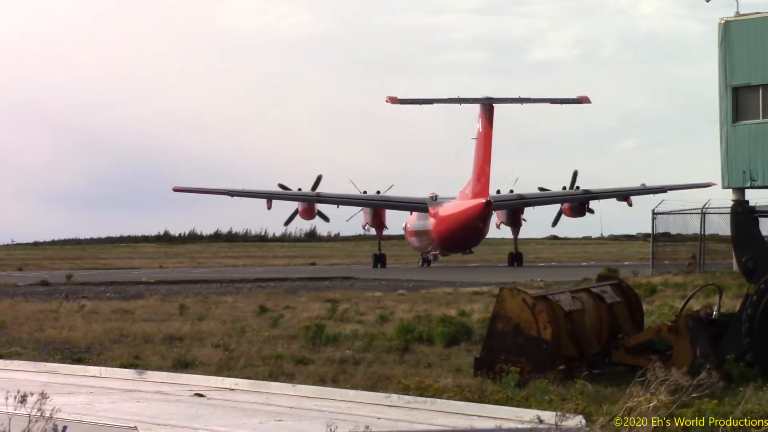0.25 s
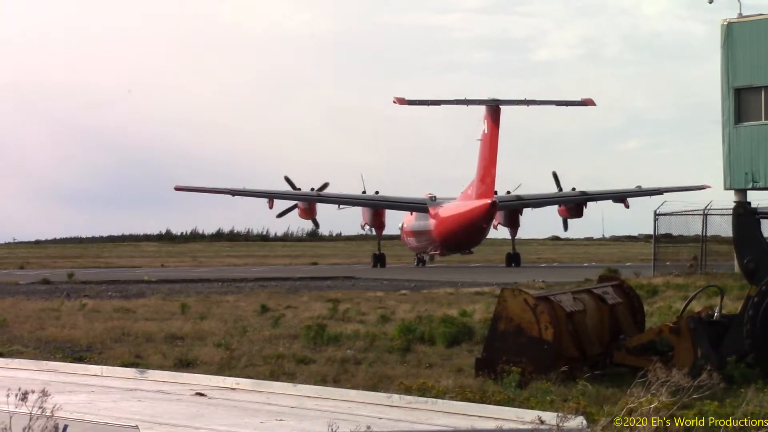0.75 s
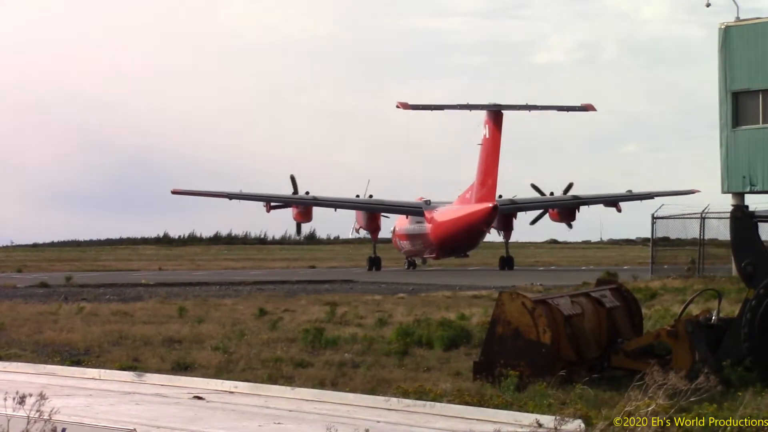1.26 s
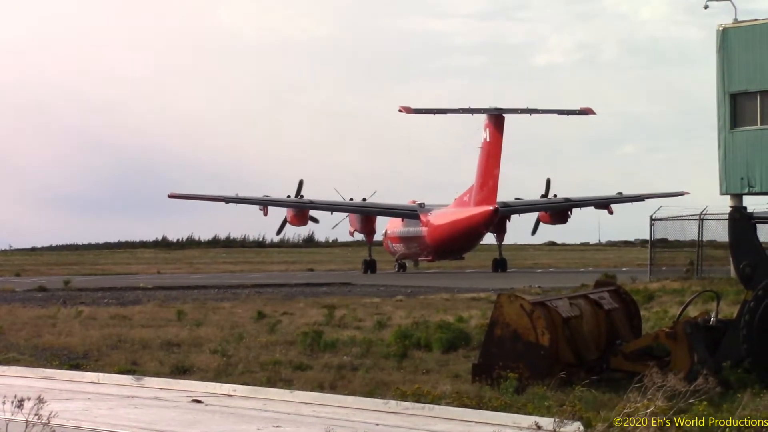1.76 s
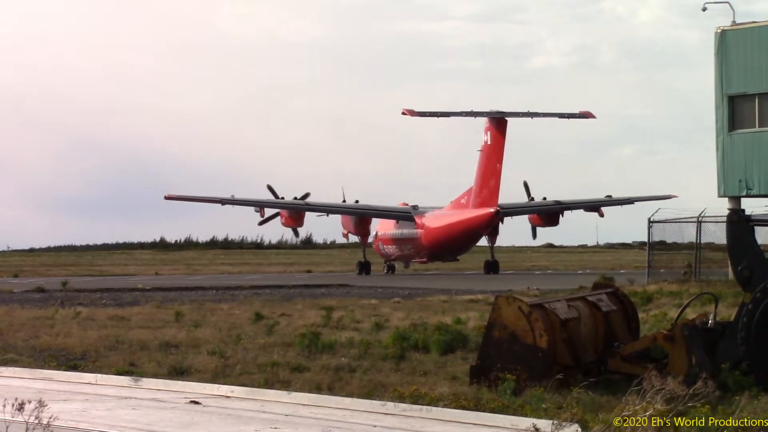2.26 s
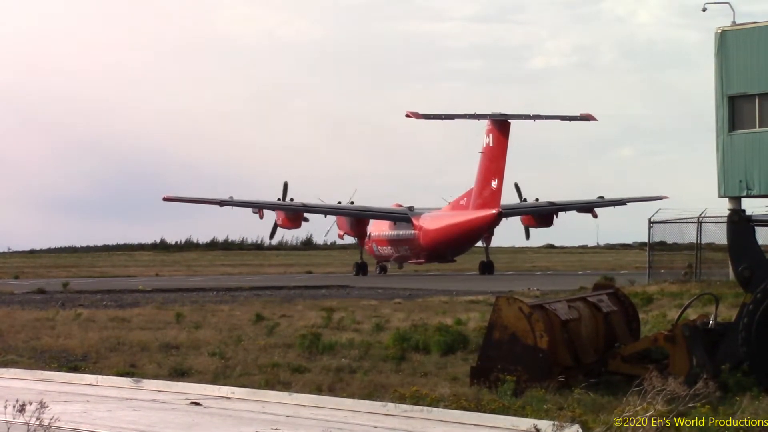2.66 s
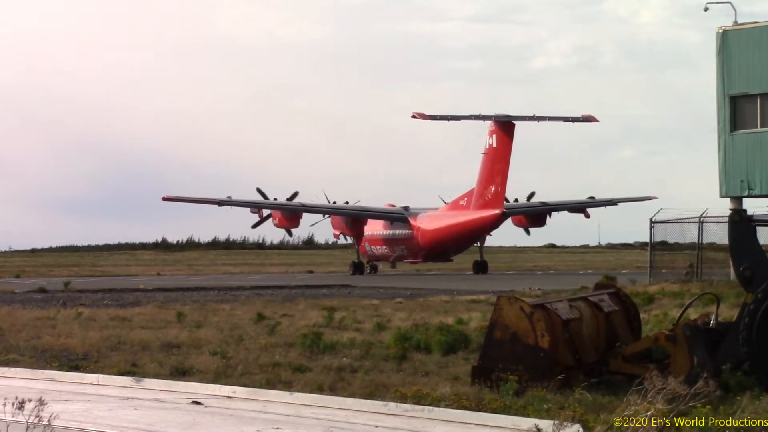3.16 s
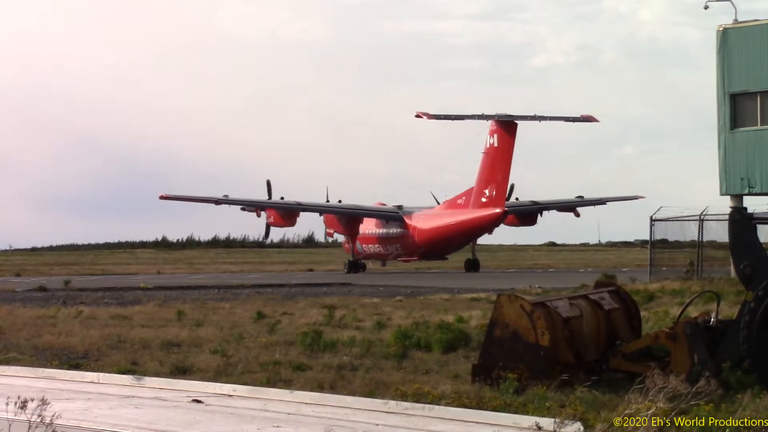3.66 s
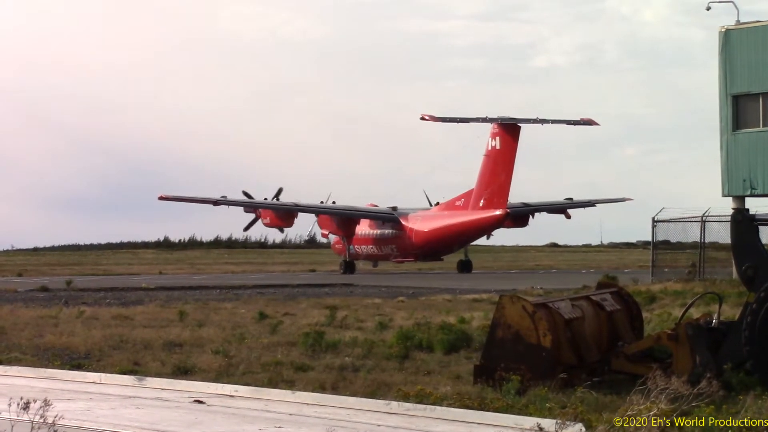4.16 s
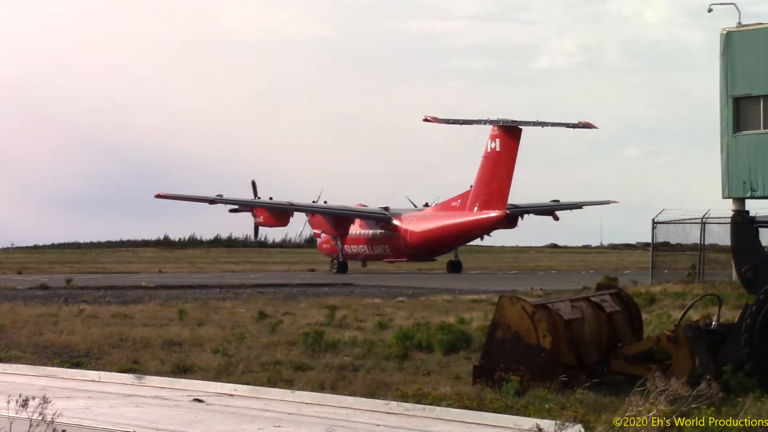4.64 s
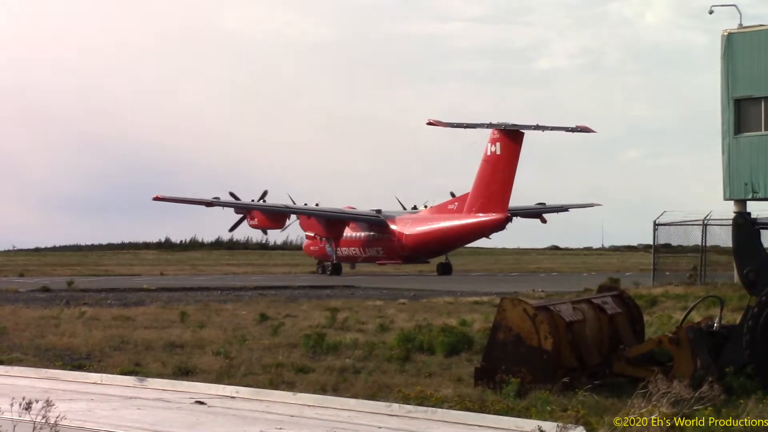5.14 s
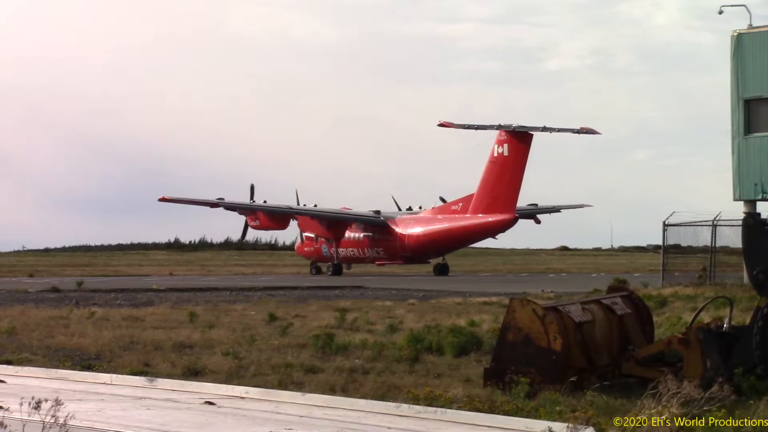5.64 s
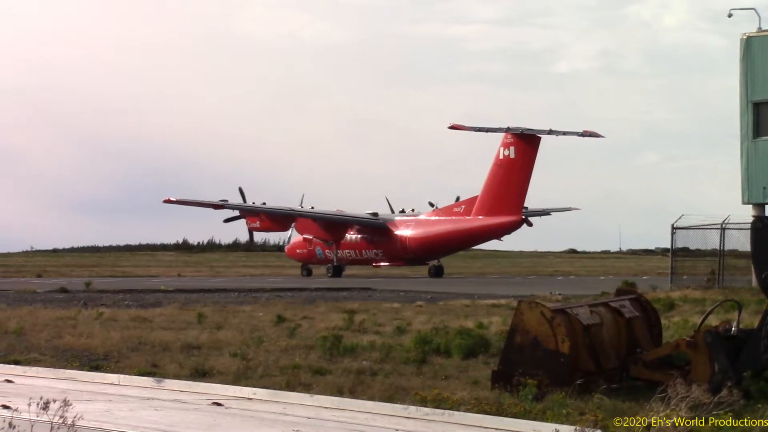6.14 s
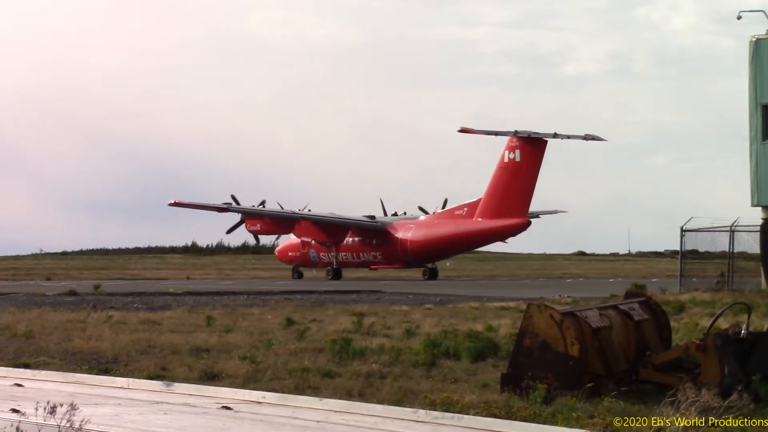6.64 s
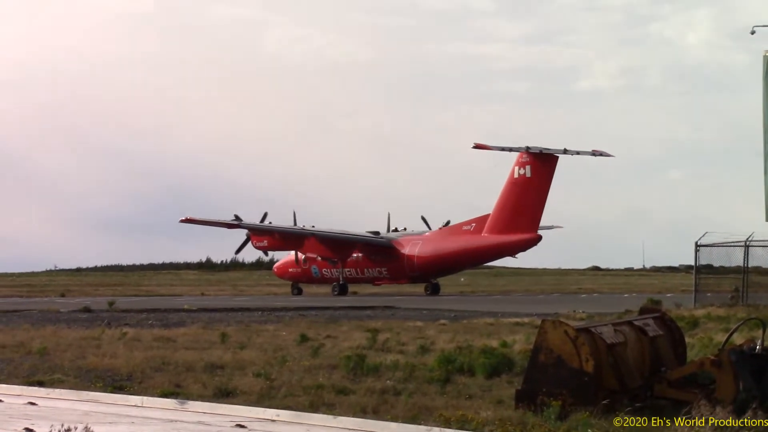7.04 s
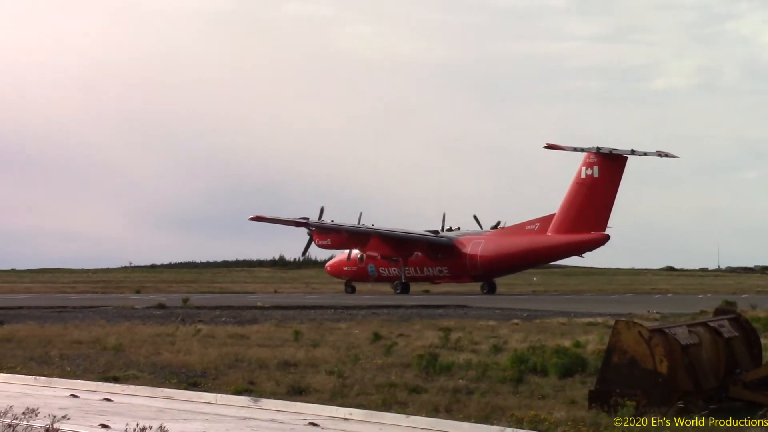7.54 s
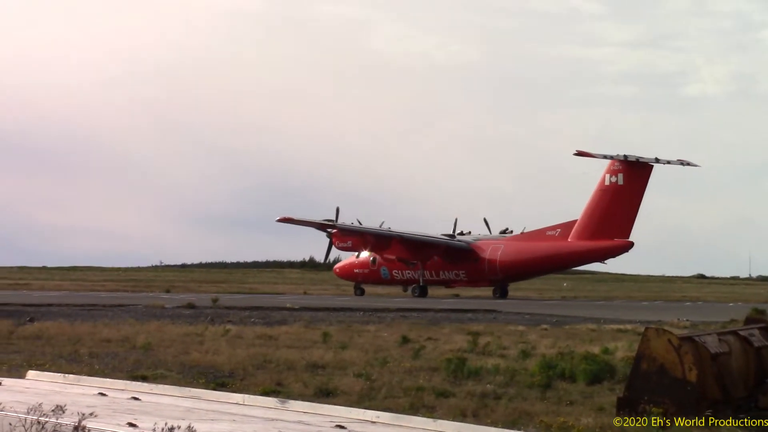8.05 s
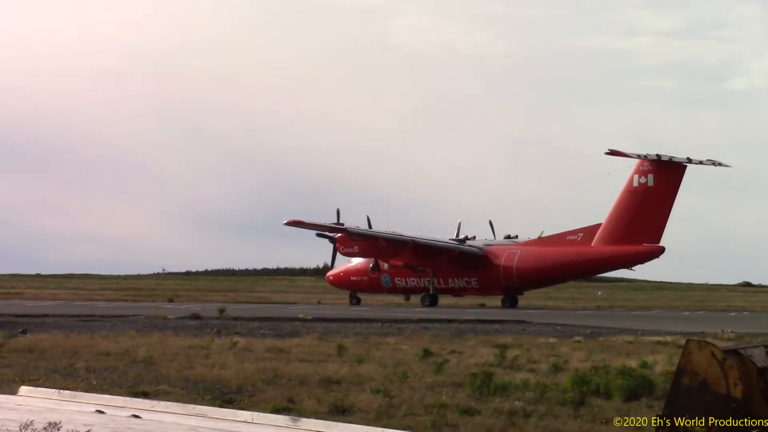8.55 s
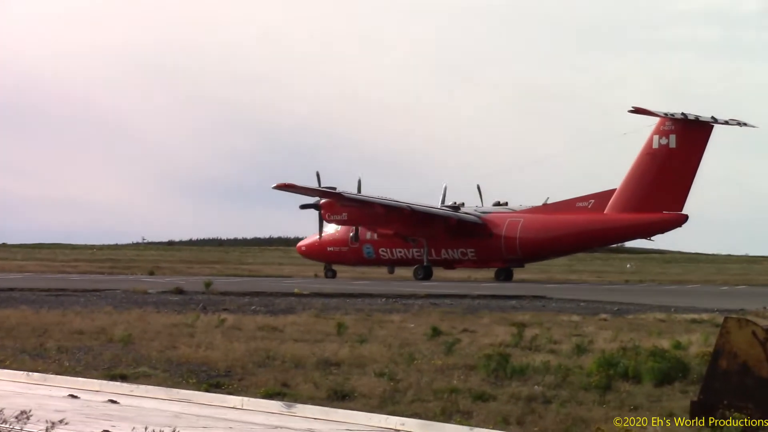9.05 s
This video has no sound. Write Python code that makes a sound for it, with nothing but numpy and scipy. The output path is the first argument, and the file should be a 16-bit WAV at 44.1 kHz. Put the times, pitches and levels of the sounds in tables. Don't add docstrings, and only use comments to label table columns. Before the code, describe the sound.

From 0 s a four-engine turboprop at low power gives a continuous broad roar, tail-on and moderately distant across an open airfield. Rough low and middle exhaust noise dominates, with turbine hiss and a blurred, airy compressor whine near 5 kHz above it. A brief hollow duct hoot colours the roar around 0.9 s. Near 2 s the low propeller hum, just under 60 Hz with harmonics, stands out, then recedes. From about 4 to 5.6 s the plane turns side-on: blade chopping gets rougher, bass boom and high hiss increase. The drone is strongest around 6.3 s, fading by 7.5 s. Thin whine flares flicker near 1.3 s and 7.7-8.4 s. Soft wind thumps occur around 1.6, 5.3, 6 and 8.6 s. Small-camera stereo sound is slightly grainy and resonant, with faint hiss; the roar is still running at the 9.3 s cut-off.

```python
import sys
import numpy as np
from scipy import signal
from scipy.fft import rfft, irfft, next_fast_len
from scipy.io import wavfile
from scipy.ndimage import uniform_filter1d, minimum_filter1d, map_coordinates

SR = 44100
rng = np.random.default_rng(int(sys.argv[2]) if len(sys.argv) > 2 else 0)


def convert_level_to_amplitude(level_db):
    exponent = np.asarray(level_db, float) / 20
    return 10 ** exponent


def store_wav(level_fs):
    pcm = np.round(np.clip(np.atleast_2d(level_fs), -1, 1) * 32767)
    wavfile.write(sys.argv[1], SR, pcm.T.astype(np.int16))


N = 410130

EDGES_HZ = [160, 220, 290, 480, 720, 1050, 2100, 4150, 6600]
# start_s, turn (0 tail-on, 1 side-on), blade_hz, blade_chop, shaft_chop, tone_db
TAXI = [
    (0, 0.063, 57.4, 0.1, 0.06, -52),
    (2, 0.016, 56.3, .08, 0.06, -30.5),
    (3.8, 0.23, 59.5, .06, 0.05, -44),
    (4.4, 0.33, 58.8, 0, 0.08, -42),
    (4.7, 0.53, 58.8, 0.2, 0.2, -54),
    (5.2, 0.7, 58.45, 0.2, 0.09, -39),
    (5.6, 0.94, 58.46, .1, 0.01, -43.5),
    (6.3, 0.97, 59.13, 0.4, 0.07, -30),
    (7.5, 0.92, 59.3, .09, 0.04, -44),
    (9.3, 1, 59.9, 0.2, 0.03, -37),
]
# freq_hz, level_db_per_hz
TAIL_ON = [(12, -66.5), (46, -20.5), (58, -3), (91, -7), (210, -3.5), (300, -6.5), (512, -7.5), (848, -7.5),
           (2220, -33), (5020, -39.5), (6610, -52), (8810, -62.5), (10510, -79.5), (13010, -100.5)]
# freq_hz, level_db_per_hz
SIDE_ON = [(12, -68), (46, -24), (58, -5), (113, -6), (249, -8), (525, -16), (957, -19), (1400, -21.5),
           (2110, -38), (5020, -52.5), (6610, -60.5), (8810, -68.5), (10510, -79), (13010, -100.5)]
# freq_hz, scattered_over_direct_db
SCATTER = [(35, -19), (70, -15.5), (130, -9.5), (250, -12.5), (500, -6), (820, -11.5), (1100, -2),
           (1450, -12.5), (2100, -5), (2800, 4.5), (4500, -5.5), (5700, -5.5), (6600, 1.5), (10000, 3.5)]
# freq_hz, width_hz, level_db
HOUSING = [(813, 170, 5), (1443, 380, 5.5), (1868, 110, 7.5), (2466, 420, 9.5), (2960, 290, 9.5),
           (3680, 600, 7), (4506, 300, 8), (5000, 320, 9), (5800, 330, 2), (7250, 500, -3.5),
           (7800, 250, 4), (8350, 1150, 6.5)]
# freq_hz, left_lead_rad
LEAD = [(900, 0), (1200, 0.4), (1900, 0.67), (2150, -2), (2500, -1.16), (2780, -2), (3050, 1.5), (4200, -1),
        (5200, -0.8), (6000, -1), (7300, -4), (7750, -0.8), (8800, 0)]
# multiple, level_db
BLADE_ORDERS = [(1, -2), (2, -2.5), (3, -6), (4, -3.5), (5, -14.5), (6, -7.5)]
# freq_hz, level_db_per_hz
GUST_COLOUR = [(10, -19), (25, -7.5), (42, -6), (55, -12.5), (90, -40.5), (200, -120)]
# freq_hz, width_hz, level_db
EXHAUST = [(64.5, 110, 0), (125, 40, 5.5), (190, 21, 9.5), (254, 26, 7), (300.2, 34, 4.5)]
SURROUND = [
    (442, 397),
    (221, 309),
]
# freq_hz, left_right_db
LEAN_TAIL = [(60, 0), (300, -1), (450, 0.5), (1000, -3), (1600, -2.5), (2200, 2), (2900, -3), (3600, -0.5),
             (4400, -3.5), (6500, 1.5), (7800, -5.5), (9300, 3.5), (10500, 1.5)]
# freq_hz, left_right_db
LEAN_SIDE = [(60, -1), (1000, -2.5), (1300, -0.5), (2000, 4), (2350, -1.5), (2620, 9.5), (2850, -3.5),
             (3150, -1.5), (4300, -3.5), (5300, 0.5), (6900, 2), (7800, -2), (9000, 4.5), (10500, 6)]
# freq_hz, level_db_per_hz
SELF_NOISE = [(3000, -23.5), (8000, -2), (10000, -0.5), (11200, -3.5), (12720, -5), (12780, -60.5)]
# start_s, low_db, treble_db
CARRY = [(0.0, -0.6, 1), (0.5, 1.8, 0.5), (0.95, 1.2, 1), (1.3, 2.1, 0.3), (1.87, 1.5, -0.5),
         (2.4, 0.5, -1.5), (3.2, -0.5, -0.85), (4.2, -0.9, -0.5), (4.55, 0.65, 0.2), (4.9, -1.3, 1),
         (5.23, 0.3, 0.9), (5.55, 1.45, 0), (6.15, 0.5, 0.55), (6.6, 1.8, -0.9), (7.05, 0.5, 0.6),
         (7.95, 0.5, -0.16), (9.08, 0, 2.5), (9.3, 2, 0.9)]
# tail_on_db, side_on_rise_db, low_carry_share, treble_carry_share, flutter_db
LAYERS = [
    (-29, 2.5, -0.1, -0.099, 1.5),
    (-36.5, 8.5, 0.6, -3, -2),
    (-33.5, 4, 0.89, 2.5, -0.5),
    (-27, 2, 2, -0.18, 0.46),
    (-31, -1.5, 0.84, 0.6, 1),
    (-36, -3, 1.1, 1.33, -0.27),
    (-39.5, 1.5, 0.96, 1.07, 0.45),
    (-53.5, 5, 0.4, 1.35, 0.27),
    (-62.5, 9.5, 1, 1.65, 0.16),
    (-74, 3, 0.2, 1.6, 1.9),
]
# peak_s, level_db,
# centre_hz, length_s
SURGES = [(0.047, 11.5, 235, 0.018), (0.215, -6.5, 1060, 0.25), (0.79, 9, 152.7, 0.12),
          (0.95, 8.5, 1100, 0.088), (1.14, -8, 297, 0.084), (1.54, -15, 162, 0.067), (1.76, -5, 317, 0.079),
          (1.86, 6, 179.7, 0.04), (2.18, -4, 1020, 0.14), (2.22, 20, 276, 0.044), (2.73, -7.5, 182, 0.26),
          (3.14, 13, 159, 0.029), (3.22, 3.5, 935, 0.12), (4.41, 4.5, 108.4, 0.26), (4.64, -3, 179, 0.24),
          (5.27, -2, 288, 0.22), (5.31, 1.5, 923, 0.36), (5.46, 15, 140, 0.024), (5.65, -9, 180, 0.074),
          (6.11, 4.5, 688, 0.13), (6.67, -9.5, 179, 0.11), (7.12, 9, 131.6, 0.048), (7.572, 6, 230, 0.18),
          (7.917, -5, 460.6, 0.06), (8.04, -2, 108.3, 0.56), (8.25, 2.5, 227, 0.098),
          (8.71, -19, 155.5, 0.039), (8.93, 1.5, 319, 0.15), (8.98, -7.5, 1173, 0.45),
          (9.263, -13, 1150, 0.044),
          (0.48, -3, 420, 0.11), (1.365, -5, 420, 0.03), (1.535, 3, 380, 0.037),
               (1.83, 3.5, 420, 0.033), (3.503, 1.5, 262, 0.071), (3.9, -0.5, 595, 0.058),
               (4.3, -1, 410, 0.13), (4.65, 3.5, 280, 0.098), (5.098, 4.5, 4400, 0.18),
               (3.85, -1.5, 5920, .5), (5.398, 0, 258, .06), (5.93, 5.5, 277, 0.047), (6.1, 0, 420, 0.066),
               (6.185, 6, 610, 0.031), (6.289, 5.5, 320, 0.04), (6.446, 10.5, 220, 0.02),
               (6.59, -0.5, 350, 0.06), (6.495, -1, 4850, 0.13), (6.84, 1, 270, 0.069),
               (6.894, 1, 600, 0.072), (7.1, 1.5, 4800, .1), (7.1, 2, 400, 0.11), (7.36, -1.5, 280, 0.1),
               (7.4, -2, 597, 0.096), (8.298, -2, 4500, 0.14), (8.8, -1, 450, 0.13), (0.99, 1, 4830, 0.12),
               (3.11, -1.5, 4760, 0.11), (6.799, -2, 6470, .1), (5.12, 2, 9300, 0.16),
               (6.6, 1.5, 9300, .15), (9.1, -3.5, 9300, .5), (9.2, 2, 9300, .2), (0.73, 0, 9300, .15),
               (7, 0.5, 2950, .3), (4.35, -0.5, 2950, .12), (5.2, 1, 5230, .1), (6.3, 1.5, 5230, .12),
               (9.12, 1.5, 5230, .15), (6.8, 2, 630, .08), (4.15, -2.5, 113, 0.1), (4.85, -1, 113, 0.051),
               (8.65, 2.5, 113, .06), (3.55, 0, 113, .06), (6.9, -1, 253, .1), (.08, -5, 170, 0.089),
               (6.75, -0.5, 530, 0.063), (5.9, -0.5, 870, .06),
          (0.17, -1.5, 253, 0.036), (0.23, -1, 588, 0.04), (0.65, -6, 253, 0.05),
                (0.68, -3.5, 588, 0.042), (0.94, 2, 253, 0.044), (1.25, -3.3, 187, 0.05),
                (1.69, -1.5, 1485, 0.05), (1.73, 7, 188, 0.046), (1.77, -10, 253, 0.05),
                (2.17, 1.5, 376, 0.03), (2.2, -10, 188, 0.058), (2.55, -1, 253, 0.042),
                (2.62, 1.5, 113, 0.043), (3.48, -2, 373, 0.045), (3.67, 1, 253, 0.056),
                (4.0, 3.5, 190, 0.05), (4.15, -6, 253, 0.033), (4.61, -6.6, 188, 0.05),
                (4.7, 3.5, 870, 0.043), (4.71, 1.5, 5230, 0.12), (4.88, 2.8, 253, 0.05),
                (5.27, 1, 870, 0.037), (5.32, -3.1, 253.2, 0.034), (5.45, 4.5, 588, 0.032),
                (5.54, 2.7, 253, 0.05), (5.56, 2.6, 1485, 0.039), (5.8, 1.5, 870, 0.05),
                (5.91, 1, 588, 0.056), (6.0, 2.4, 870, 0.05), (6.06, -8, 188, 0.042),
                (6.15, 4.5, 254, 0.066), (6.36, -6, 187.3, 0.04), (6.59, 0, 253, 0.05),
                (6.74, 3.5, 188.4, 0.05), (6.96, -1, 588, 0.04), (7.3, -4, 251.6, 0.05),
                (7.52, -1.5, 188, 0.039), (7.63, 0, 588, 0.043), (7.67, -0.5, 370, 0.04),
                (7.81, -6, 253, 0.03), (7.89, -3.0, 188, 0.05), (8.01, -2, 373, 0.13),
                (8.14, 3, 188, 0.034), (8.4, -1.5, 373, 0.05), (8.5, 7.5, 188, 0.045),
                (8.51, -4, 253, 0.05), (8.59, -0.5, 863, 0.12), (9.21, -8, 186, 0.04),
          (0.01, 2, 113, 0.06), (0.96, -2, 9330, 0.06), (1.22, 2.2, 5230, 0.056),
                (1.27, 1.5, 9330, 0.06), (1.54, -2.5, 253, 0.16), (1.57, -1.5, 588, 0.055),
                (1.69, -2, 113, 0.06), (1.78, -2.4, 2950, 0.06), (1.83, -2, 373, 0.054),
                (1.95, 3.2, 253, 0.06), (2.13, -1, 5230, 0.06), (2.17, 3.5, 113, 0.066),
                (2.51, 2.5, 870, 0.055), (2.63, 3, 113, 0.06), (2.88, -0.5, 2950, 0.06),
                (3.27, 2, 113, 0.06), (3.62, -2, 373, 0.06), (3.76, 3, 5230, 0.06), (3.81, 2.6, 113, 0.06),
                (3.92, -5, 253, 0.06), (3.92, 2, 9330, 0.15), (4.32, -2.5, 113, 0.06),
                (4.6, -1.5, 588, 0.15), (4.83, 1.8, 5230, 0.15), (4.84, -2.1, 373, 0.06),
                (5.21, 1.5, 2950, 0.15), (5.31, 3.1, 113, 0.052), (5.72, 2.6, 113, 0.06),
                (5.81, -1, 870, 0.06), (5.9, 2, 588, 0.06), (6.2, -2.4, 9330, 0.06),
                (6.34, -0.5, 2950, 0.15), (6.56, -1.5, 373, 0.06), (6.88, 3.4, 113, 0.059),
                (7.32, 1.9, 373, 0.055), (7.42, -2.5, 9330, 0.15), (7.48, 2.0, 2950, 0.06),
                (7.65, -2.5, 588, 0.054), (7.95, 3, 253, 0.054), (8.02, -1, 870, 0.06),
                (8.3, -3, 188, 0.06), (8.35, 1, 5230, 0.06), (8.58, -1.3, 870, 0.15), (8.79, 1, 373, 0.15),
                (8.89, 3.3, 113, 0.06)]
# start_s, pitch_hz, lift_db
SPOOL = [
    (0, 5000, 6.5),
    (.35, 4994, 5),
    (1.6, 4910, -5.5),
    (2.55, 4960, 2),
    (4.3, 5043, 2),
    (5.5, 5070, -8),
    (6.25, 5080, 6),
    (7.0, 5000, 1.5),
    (8.14, 4950, 1),
    (9.3, 4940, -1),
]
# peak_s, rise_db, length_s
FLARES = [
    (1.268, 17.5, .06),
    (1.6, 11, .08),
    (6.3, -4, .08),
    (6.9, 2, .08),
    (7.748, 13, .04),
    (7.98, 17.5, .025),
    (8.146, 23, 0.045),
    (8.307, 16.5, .025),
    (8.441, 15, 0.045),
    (9.154, 14, 0.074),
]
# peak_s, rise_db
GUSTS = [(.39, 3), (.7, -7), (1.62, 20), (2.17, 6), (2.9, 5), (3.62, 7), (5.28, 17), (5.46, 3), (5.95, 23),
         (6.22, 18), (7.05, 5), (7.48, 7), (8.2, 10.5), (8.65, 15), (9.12, 8)]
# start_s, left_right_low_roar_db
SWING = [(0, 1), (2, 0.1), (2.6, 0.5), (3.4, 1.5), (3.9, 1), (4.7, 2.5), (5.3, 1), (6.1, 0), (7, -0.3),
         (7.7, 0.5), (9.3, 0)]
GAP_SHARE = [
    .12,
    .65,
]

SURGE_OCTAVES, FLUTTER_PER_S = 0.24, 10
NARROW_DB, WIDE_DB, WIDE_TURN_DB, WIDE_CARRY = -70, -66.5, 8.5, 1.5
BREEZE_DB, GUST_S, LULL_DB = -56.5, .06, 2
HOOT_S, HOOT_HZ, HOOT_DB, HOOT_LENGTH_S = 0.92, 840, -29, 0.08
FADE_S, BLOCK_S = .0012, 1024 / 48000
GAP_DB, GAP_TURN_DB = -6, -5


def unit(x):
    return x / np.sqrt(np.mean(np.atleast_2d(x).mean(0) ** 2) + 1e-20)


def along(points, hz):
    f, v = np.transpose(points)
    return np.interp(np.log(hz + 1), np.log(f + 1), v)


def curves(rows):
    s, *cols = np.transpose(rows)
    return [np.interp(np.arange(N) / SR, s, c) for c in cols]


def wobble(rate):
    coarse = np.arange(0, N + 16, 16)
    knots = rng.standard_normal(int(N * rate / SR) + 4)
    return np.interp(np.arange(N), coarse, map_coordinates(knots, [coarse * rate / SR]))


def filtered(x, response):
    pad = 4096
    m = next_fast_len(N + 2 * pad)
    wide = np.pad(x, [(0, 0)] * (x.ndim - 1) + [(pad, m - N - pad)], mode="reflect")
    return irfft(rfft(wide) * response(np.fft.rfftfreq(m, 1 / SR)), m)[..., pad:N + pad]


def bumps(modes, f):
    return sum(db / (1 + (2 * (f - c) / w) ** 2) for c, w, db in modes)


def swells(rows, seconds, weights=1):
    s, db = np.transpose(rows)[:2, :, None]
    coarse = np.arange(0, N + 64, 64)
    bells = db * np.exp(-.5 * ((coarse / SR - s) / seconds) ** 2)
    return np.interp(np.arange(N), coarse, (np.reshape(weights, (-1, 1)) * bells).sum(0))


def shimmer(count, patchy_db, high=5, long=14):
    z = signal.stft(rng.standard_normal((count, N)), nperseg=512)[2]
    field = uniform_filter1d(rng.standard_normal(z.shape[1:]), size=int(high), axis=0)
    field = uniform_filter1d(field, size=int(long), axis=1)
    return signal.istft(z * convert_level_to_amplitude(patchy_db * field / field.std()), nperseg=512)[1][:, :N]


def steady(x, seconds):
    power = uniform_filter1d(x.mean(0) ** 2, max(int(seconds * SR), 1))
    return x / np.sqrt(np.abs(uniform_filter1d(power, max(int(seconds * SR), 1))) + 1e-20)


def hiss_gaps():
    count = int(N / SR / BLOCK_S) + 1
    starved = rng.random(count) < np.resize(GAP_SHARE, count)
    block = (np.arange(N) / SR / BLOCK_S).astype(int)
    gate = uniform_filter1d(starved[block] * 1., size=300)
    return convert_level_to_amplitude(gate * (GAP_DB + GAP_TURN_DB * curves(TAXI)[0]))


def camera_hiss():
    noise = shimmer(count=2, patchy_db=2.0, high=20, long=3.5)
    hiss = unit(filtered(noise, lambda f: convert_level_to_amplitude(along(SELF_NOISE, f))))
    return convert_level_to_amplitude(-76.5) * hiss * hiss_gaps()


def camera_floor():
    return convert_level_to_amplitude(-84) * unit(shimmer(count=2, patchy_db=2.5, high=30, long=4.5))


def wind():
    noise = rng.standard_normal((3, N))
    buffet_db = BREEZE_DB + swells(GUSTS, GUST_S) + LULL_DB * wobble(6.7)
    rumble = filtered(noise[0] + .12 * noise[1:], lambda f: convert_level_to_amplitude(along(GUST_COLOUR, f)))
    return convert_level_to_amplitude(buffet_db) * steady(rumble, seconds=.2)


def hoot():
    t = np.arange(N) / SR
    bell = np.exp(-.5 * ((t - HOOT_S) / HOOT_LENGTH_S) ** 2)
    return convert_level_to_amplitude(HOOT_DB) * bell * np.sin(2 * np.pi * HOOT_HZ * t)


def whine():
    upper_hz, lift_db = curves(SPOOL)
    lower_db = NARROW_DB + swells(FLARES, np.transpose(FLARES)[2, :, None])
    upper_db = WIDE_DB + lift_db + WIDE_TURN_DB * curves(TAXI)[0] + WIDE_CARRY * curves(CARRY)[1]
    # pitch_hz, level_db, port_lag_rad, stray_hz
    tones = [(4860, lower_db, .8, 20),
             (upper_hz, upper_db + 0.5, .8, 95),
             (7800, upper_db - 33.0, 1.5, 50)]
    out = 0
    for hz, db, lag, stray_hz in tones:
        phase = 2 * np.pi * np.cumsum(hz + stray_hz * wobble(120)) / SR
        out = out + convert_level_to_amplitude(db + 2.7 * wobble(11)) * np.sin(phase + [[-lag / 2], [lag / 2]])
    return out


def propellers():
    _, blade_hz, _, _, tone_db = curves(TAXI)
    out = 0
    for detune in [.992, .999, 1.003, 1.011]:
        phase = 2 * np.pi * np.cumsum(blade_hz * (detune + 0.0053 * wobble(3.1))) / SR
        for k, db in BLADE_ORDERS:
            out = out + convert_level_to_amplitude(db + 0.87 * wobble(0.51)) * np.sin(k * phase + rng.uniform(0, 7.5))
    return convert_level_to_amplitude(tone_db - 13.0) * out


def aspect(spectrum, lean, chop, scatter_db, housing, boom):
    noise = shimmer(count=3, patchy_db=1.04)

    def case(f):
        ports = np.exp(np.outer([.5j, -.5j], along(LEAD, f)))
        return convert_level_to_amplitude(housing * bumps(HOUSING, f)) * ports

    def scatter(f):
        return convert_level_to_amplitude(along(SCATTER, f) + scatter_db)

    def colour(f):
        tilt_db = np.outer([.5, -.5], along(lean, f))
        level = convert_level_to_amplitude(along(spectrum, f) + tilt_db + boom * bumps(EXHAUST, f))
        return level / np.sqrt(1 + scatter(f) ** 2)

    direct = filtered(noise[0] * chop, case)
    scattered = filtered(noise[1:], scatter)
    return filtered(direct + scattered, colour)


def layer_levels(turn):
    low_db, treble_db = curves(CARRY)
    edges = np.log2([EDGES_HZ[0] / 2, *EDGES_HZ, EDGES_HZ[-1] * 2])
    rows = SURGES
    _, _, surge_hz, length_s = np.transpose(rows)
    levels = []
    for layer, centre in zip(LAYERS, (edges[1:] + edges[:-1]) / 2):
        db, rise_db, low, treble, flutter_db = layer
        reach = np.exp(-.5 * ((np.log2(surge_hz) - centre) / SURGE_OCTAVES) ** 2)
        level = db + rise_db * turn + low * low_db + treble * treble_db
        level = level + swells(rows, length_s[:, None], reach)
        levels.append(level + flutter_db * wobble(FLUTTER_PER_S))
    return levels


def engines():
    turn, blade_hz, blade, shaft, _ = curves(TAXI)
    revs = 2 * np.pi * np.cumsum(blade_hz) / SR / 4
    revs = revs - revs[int(4.69 * SR)]
    swish = np.exp(3.6 * np.cos(revs))
    swish = swish / swish.mean() - 1

    def chop():
        return 1 + .75 * blade * (np.cos(4 * revs + .8 * wobble(2.5)) + .4 * np.cos(8 * revs))

    tail = aspect(TAIL_ON, LEAN_TAIL, chop(), scatter_db=3.5, housing=0.14, boom=1.0)
    side = aspect(SIDE_ON, LEAN_SIDE, chop(), scatter_db=1.0, housing=1.0, boom=0.92)
    turn = np.clip(turn, 0, 1)
    blend = np.sqrt(1 - turn) * unit(tail) + np.sqrt(turn) * unit(side)

    def band_split(f):
        edges = np.array([0, *EDGES_HZ, SR])[:, None, None]
        return -np.diff(1 / (1 + (edges / (f + 1)) ** 12), axis=0)

    bands = filtered(blend, band_split)
    swing_db = np.outer([.5, -.5], curves(SWING)[0])
    depths = [0.11, 0.1, 0.078, 0.0, 0.0, 0.48, 0.69, 0.053, 0.96, 0.52]
    follows = [.8, 1.1, 1.1, 1.1, .9, .6, .4, .2, .1, .1]
    out = 0
    for band, db, depth, follow in zip(bands, layer_levels(turn), depths, follows):
        beat = 1 + depth * shaft * swish
        out = out + convert_level_to_amplitude(db + follow * swing_db) * steady(band, seconds=0.15) * beat
    return out


def scene():
    return wind() + hoot() + whine() + propellers() + engines()


def surround(x, share, loop_gain, split_hz, cut_hz):
    def late(f, count):
        return np.exp(-2j * np.pi * f * count / SR)

    def branch(f, lag, loop):
        return late(f, lag) * (late(f, loop) - loop_gain) / (1 - loop_gain * late(f, loop))

    def rear(f):
        bass = 1 / (1 + (f / split_hz) ** 2)
        both = bass * branch(f, *SURROUND[0]) + (1 - bass) * branch(f, *SURROUND[1])
        return share * 1j * f / (cut_hz + 1j * f) * both

    back = filtered((x[0] - x[1]) / 2, rear)
    return x + [back, -back]


def limiter(x):
    gain = minimum_filter1d(.58 / (np.abs(x).max(0) + 1e-9), 441)
    return x * np.minimum(1, uniform_filter1d(gain, 441))


def top_cut(x):
    return signal.sosfilt(signal.butter(12, 15740, fs=SR, output="sos"), x)


def record(dry):
    wide = surround(dry + camera_hiss(), share=.49, loop_gain=.37, split_hz=3000, cut_hz=125)
    held = limiter(wide)
    fade = np.minimum(1, (N - np.arange(N)) / (FADE_S * SR))
    mix = (held + camera_floor()) * np.sin(fade * np.pi / 2) ** 2
    return top_cut(mix)


dry = scene()
out = record(dry)
store_wav(out)
```